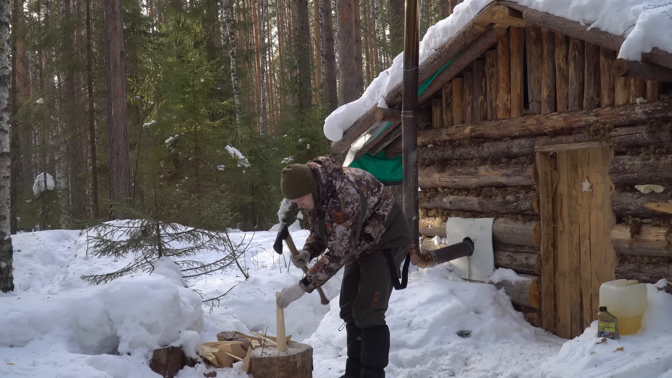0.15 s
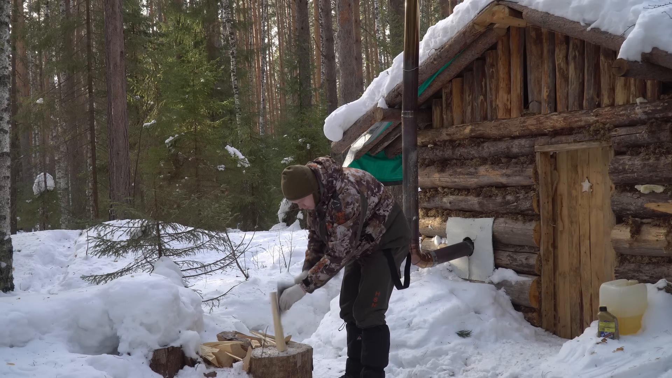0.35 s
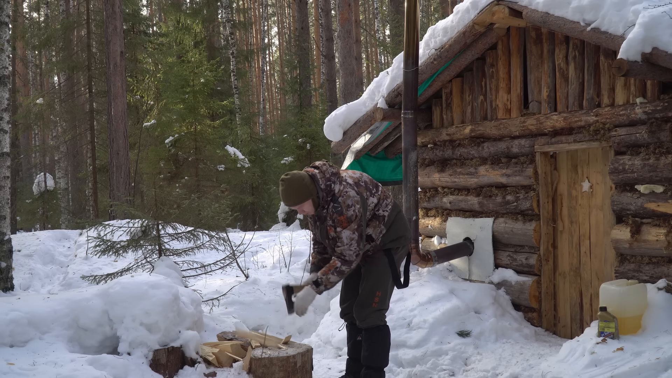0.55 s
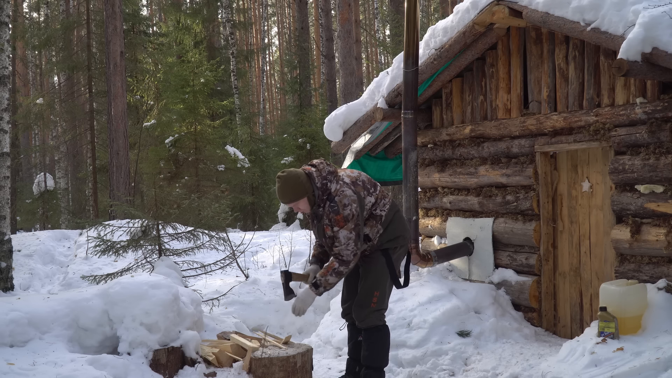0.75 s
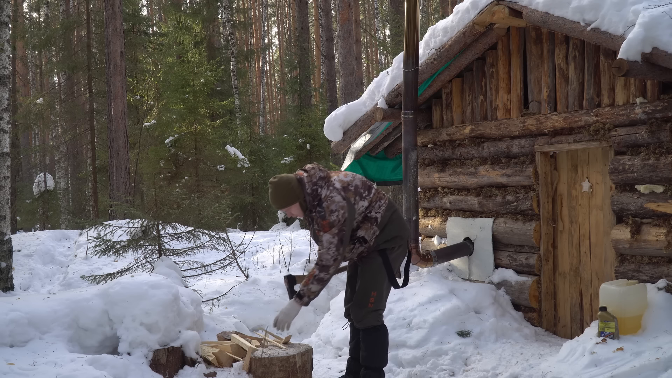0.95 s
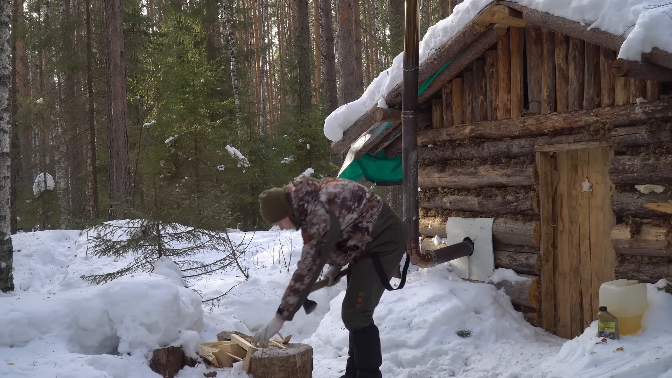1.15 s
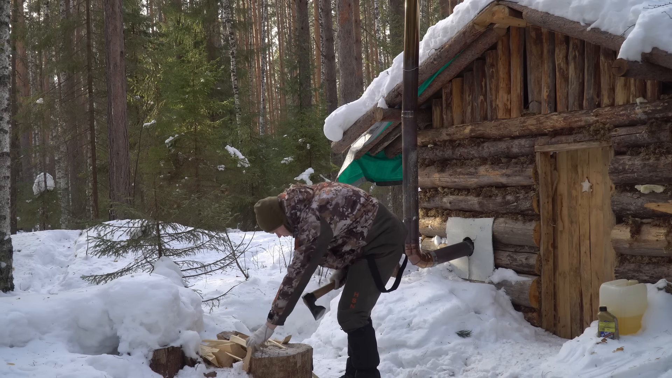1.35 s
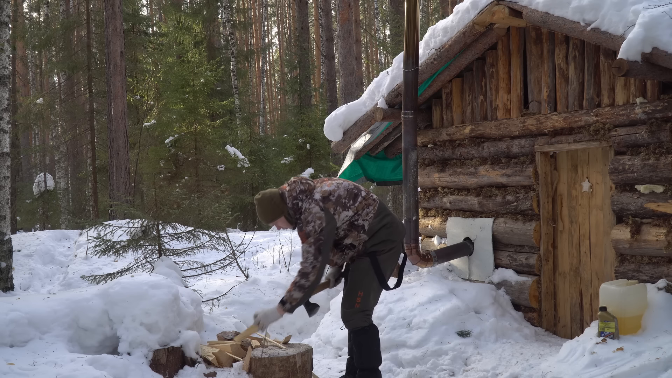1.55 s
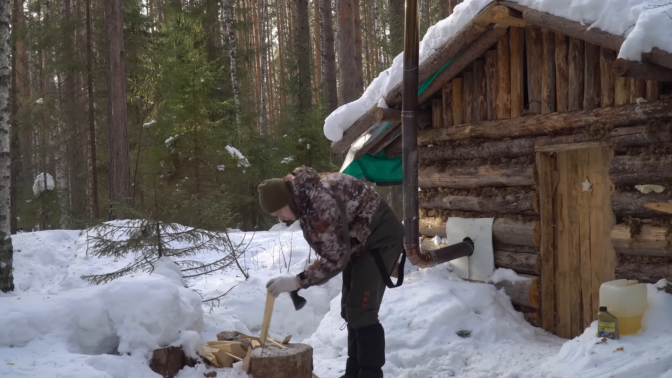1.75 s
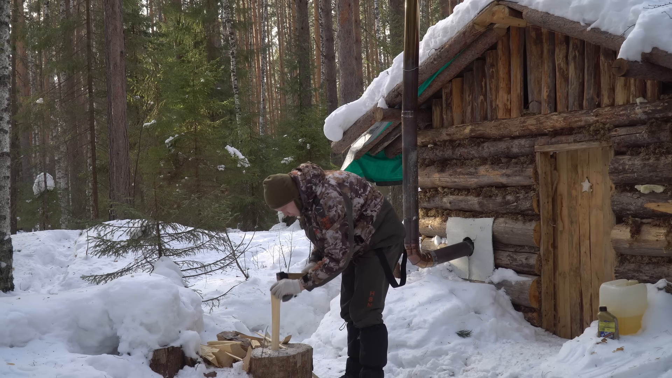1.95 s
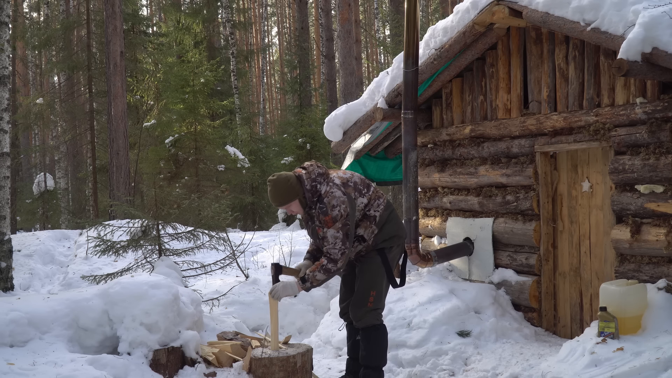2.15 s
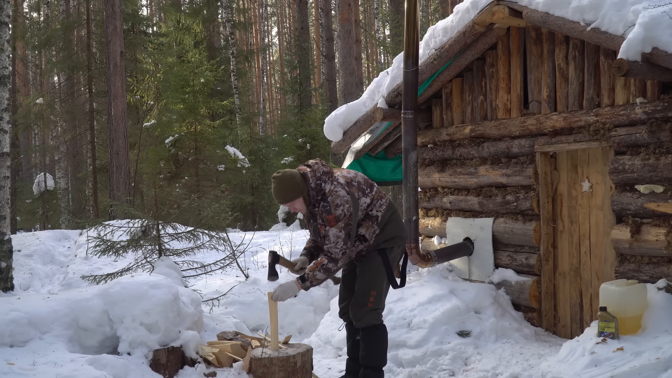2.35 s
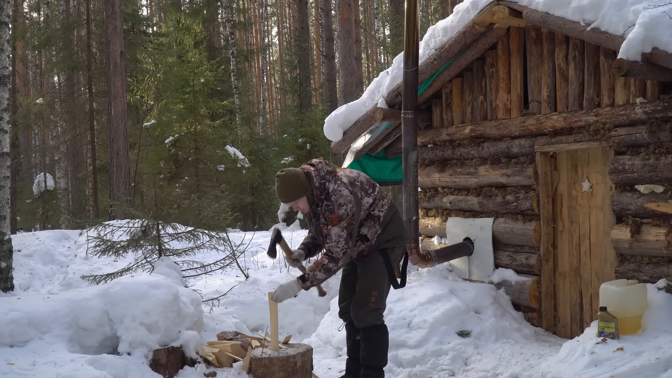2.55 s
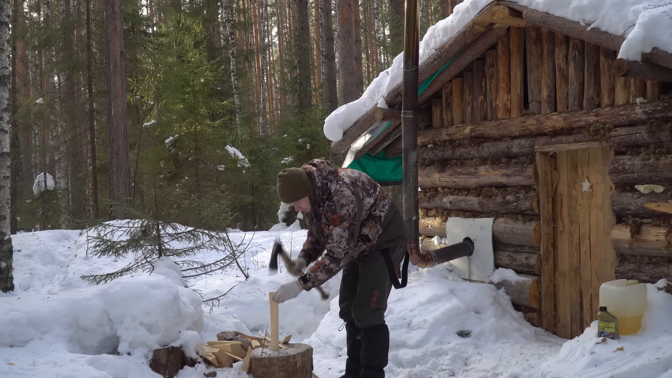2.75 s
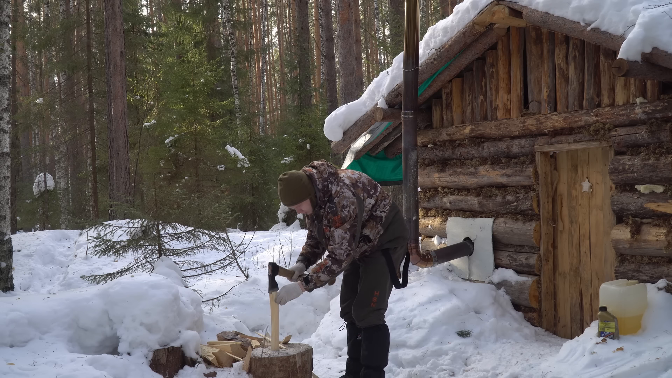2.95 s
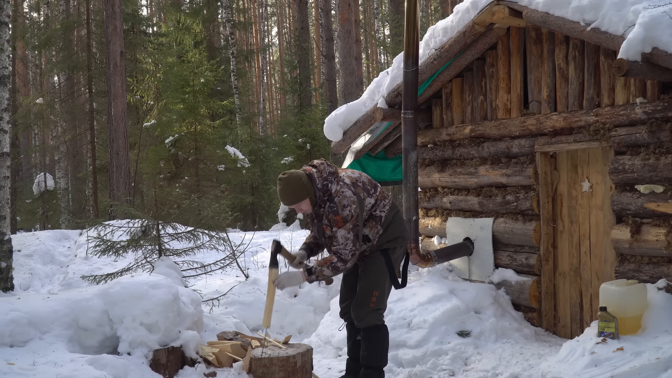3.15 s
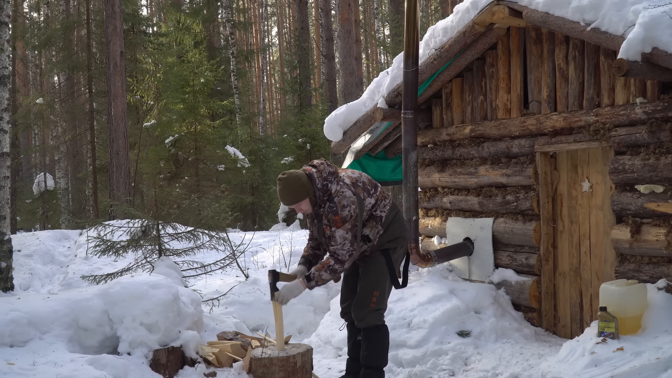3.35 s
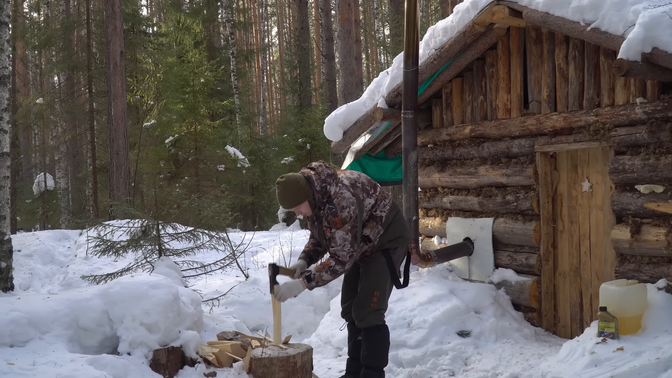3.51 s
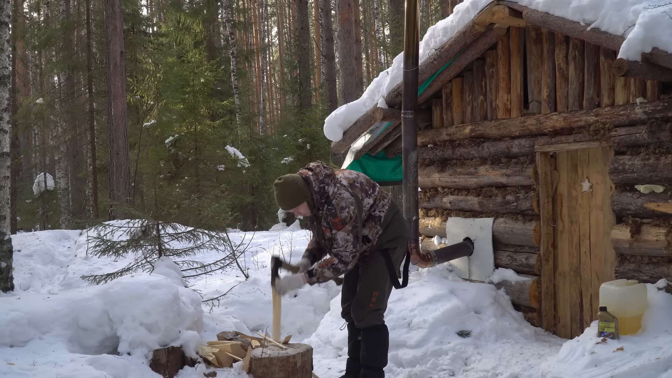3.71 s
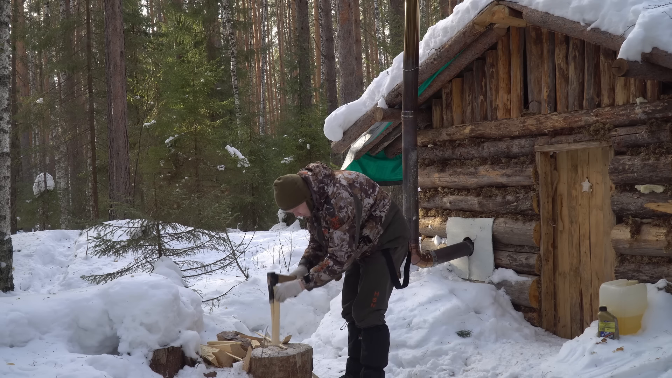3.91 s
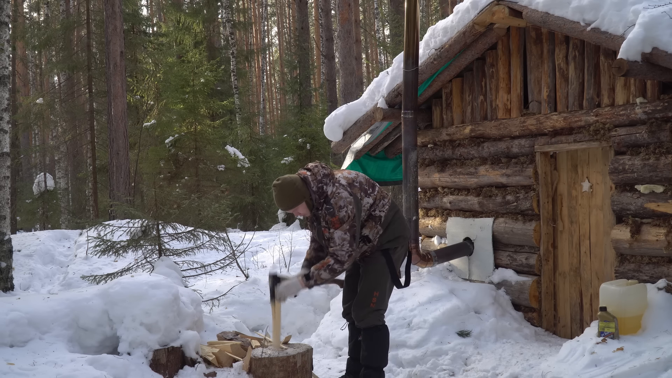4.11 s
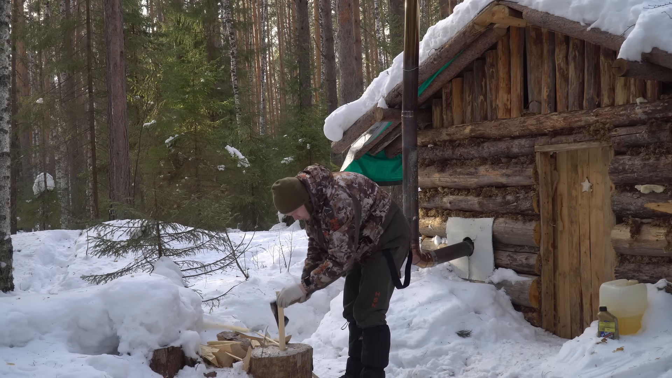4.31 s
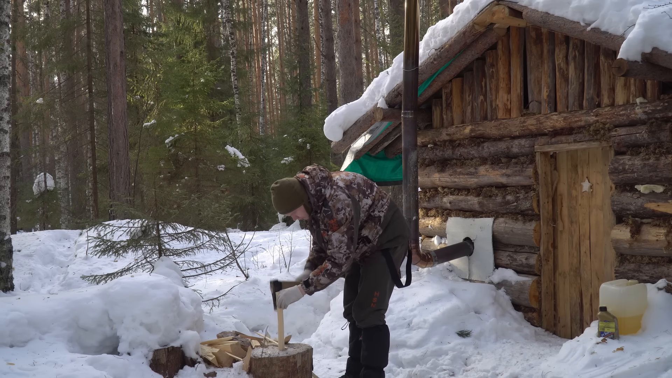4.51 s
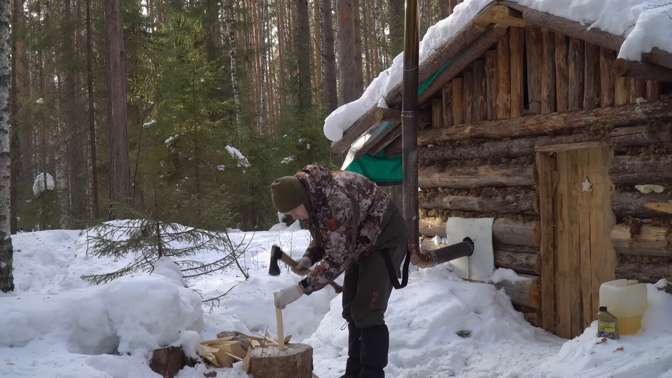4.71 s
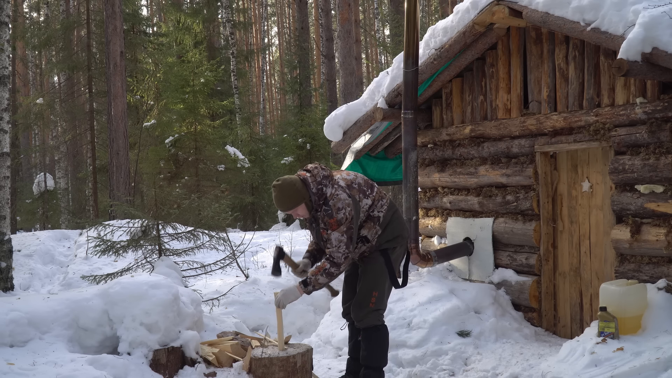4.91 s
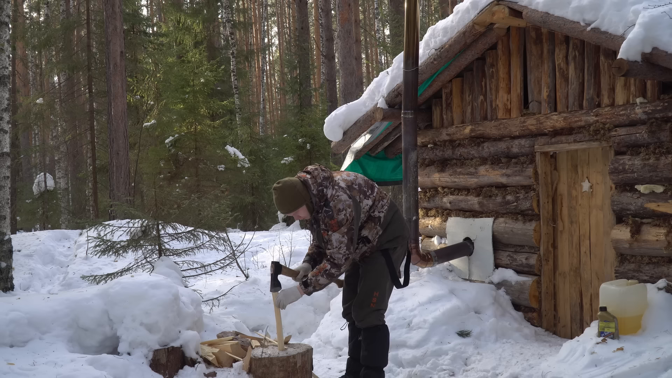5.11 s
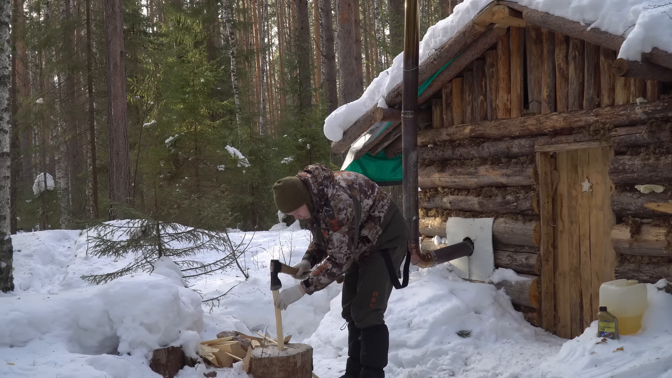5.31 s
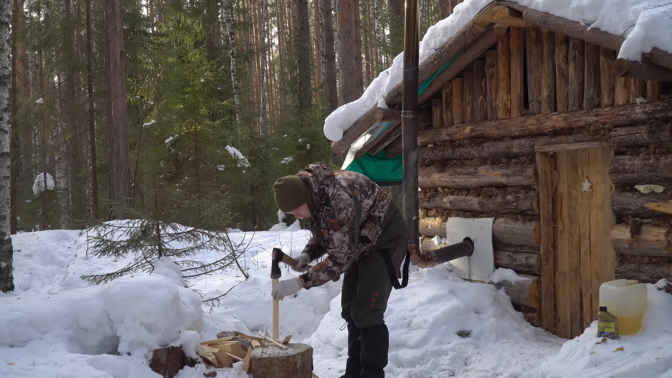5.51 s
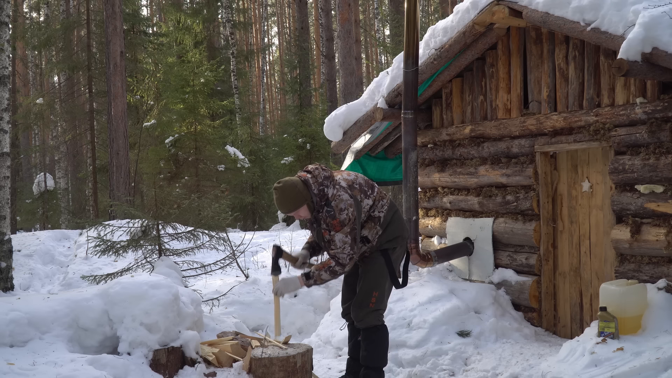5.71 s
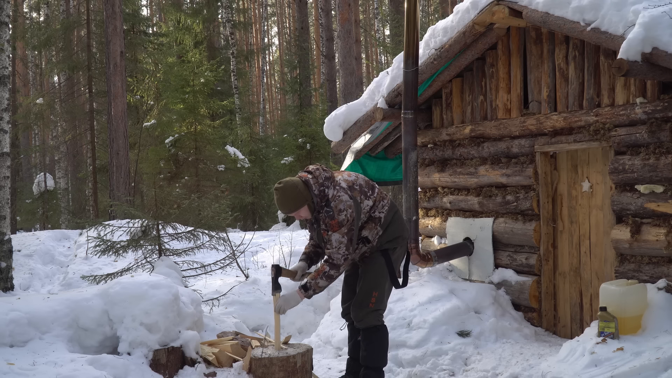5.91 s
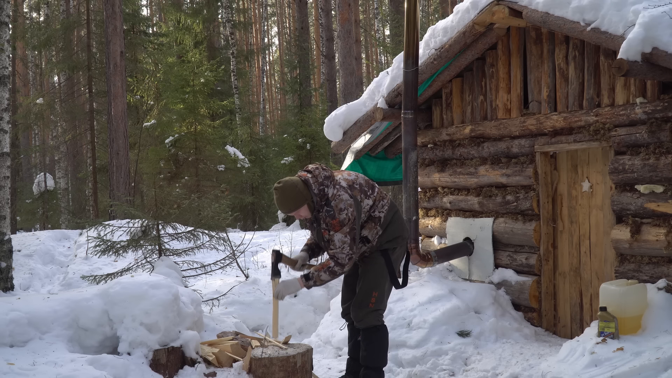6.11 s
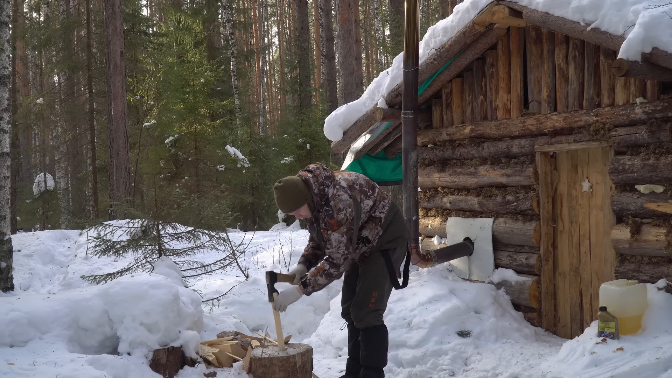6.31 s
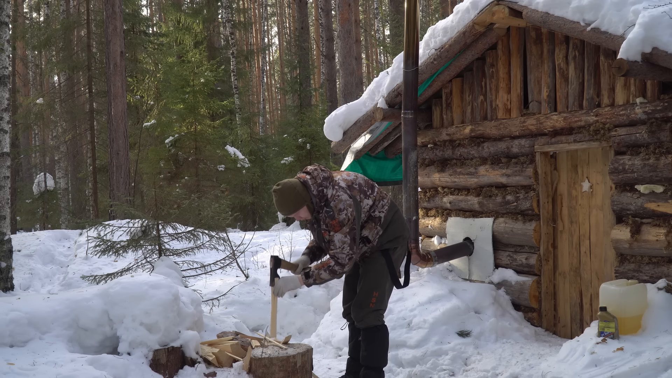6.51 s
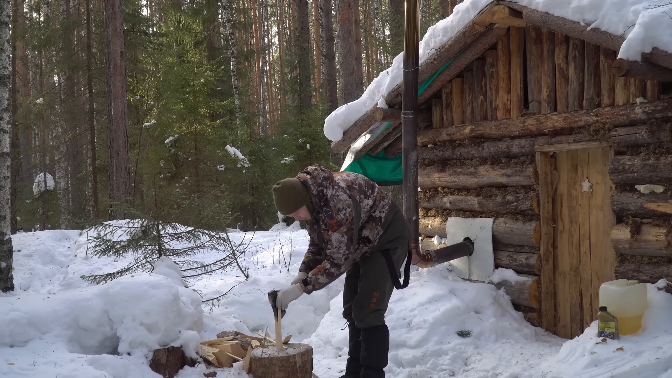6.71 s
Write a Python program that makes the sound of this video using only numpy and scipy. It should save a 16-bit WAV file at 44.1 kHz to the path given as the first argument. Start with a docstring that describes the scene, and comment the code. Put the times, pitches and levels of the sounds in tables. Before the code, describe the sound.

An axe splits dry kindling on a wooden block in a quiet snowy forest, sharp cracks and hollow knocks with split sticks clattering down.

```python
"""In a snowy forest, an axe splits dry kindling on a chopping block a few metres from the microphone.
Each blow is a soft push that sets block, ground and billet ringing; tearing fibres are runs of noisy cracks.
Split sticks knock on the pile and ring in their bending modes; chips tick as short puffs of grains.
Trunks scatter back a tail of fading noise. Below lie a steady forest hush and a rustle of noise and crackles:
first the dying tail of an earlier chop, then the handling of sleeves and wood."""
import sys
import numpy as np
from scipy import signal
from scipy.io import wavfile

SR = 44100
rng = np.random.default_rng(int(sys.argv[2]) if len(sys.argv) > 2 else 0)


def wav_record(signal):
    """Record a signal, one row per channel, as 16-bit PCM in the file named by sys.argv[1]."""
    frames = np.transpose(np.atleast_2d(signal))
    bounded = np.clip(frames, -1, 1)
    # unit amplitude maps onto the largest positive 16-bit level
    quanta = np.round(bounded * 32767).astype(np.int16)
    wavfile.write(sys.argv[1], SR, quanta)


def volts_from_decibels(level):
    """Turn decibel levels (scalar or array-like) into linear amplitude factors."""
    exponent = np.asarray(level, float) / 20
    return 10 ** exponent


N = 302526   # length of the scene in samples

# colour of the forest hush: pitch_hz, level_db (per Hz)
HUSH_COLOUR = [(15, -30), (25, 0), (97, -10), (166, -8.5), (212, -8), (384, -6), (734, -4), (796, -5.5),
               (1940, -17), (2480, -24), (5000, -35), (7310, -69.5), (14800, -43), (16000, -46)]
# colour of the rustle: pitch_hz, level_db (per Hz)
RUSTLE_COLOUR = [(1500, -11.5), (3500, 17.5), (8000, 3.5), (16000, -0.5)]
# level of the rustle, first the dying tail of an earlier chop, then handling of sleeves and wood:
# time_s, level_db
RUSTLE_LEVEL = [(0, -63.5), (0.16, -72.5), (0.5, -73), (1.2, -66), (1.7, -68), (2.4, -71.5), (3.5, -68.5),
                (4.601, -70), (5.599, -73.5), (6.86, -69.5)]
# split sticks by name, each a list of bending modes: pitch_hz, level_db, t60_s (time to fall by 60 dB)
STICK_MODES = { "short": [(685, -15, 0.18), (1200, -5.5, 0.055), (1534, 2.5, 0.08), (3068, -9, 0.07),
               (4570, -9.5, 0.04)], "struck": [(1443, -1.5, 0.083), (1480, -16, 0.032), (2350, -27, 0.028),
               (2596, -1, 0.041), (3010, 2, 0.017), (4960, -13, 0.11)], "thick": [(1060, -2.5, 0.19),
               (1349, 1.5, 0.087), (2170, -2.5, 0.039), (2616, -4.5, 0.038), (3130, -10.5, 0.068)],
               "thin": [(1623, -17.5, 0.09), (1910, -2.5, 0.069), (2954, -18, 0.083), (3390, -10.5, 0.059),
               (4540, -11, 0.035), (6100, -19, 0.012), (8100, -10, 0.0099)], "long": [(489, -19.5, 0.18),
               (1030, -10.5, 0.1), (1311, 2.5, 0.13), (2460, -7, 0.097), (4030, -14.5, 0.17)], }
# sticks being knocked: start_s, level_db, spot along the stick (0 end, 0.5 middle),
# share of its free ring time, stick name
STICK_KNOCKS = [(0.001, -42, 0.17, 0.96, "long"), (0.0836, -27, 0.024, 0.36, "short"),
                (0.094, -38, 0.049, 1, "short"), (0.201, -43.5, 0.18, 0.3, "long"),
                (0.261, -40.5, 0.19, 0.21, "long"), (0.228, -45, .17, .3, "long"),
                (0.283, -46, 0.18, 0.25, "long"), (0.332, -47, 0.15, .3, "long"),
                (0.411, -12.5, 0.036, 0.52, "struck"), (0.6827, -13.5, 0.021, 0.89, "thick"),
                (0.803, -43, 0.024, 1, "thick"), (0.828, -31, 0.13, 0.21, "thick"),
                (0.836, -24.5, 0.18, 0.55, "thick"), (0.835, -16.5, 0.073, 0.91, "thin"),
                (0.891, -38, 0.25, 0.63, "thin"), (0.978, -23, 0.019, 1, "thin"),
                (1.083, -33, 0.021, 1, "thin"), (1.588, -39, 0.29, 0.75, "thin"),
                (1.650, -46, 0.22, 0.83, "thin"), (1.608, -39, 0.029, 0.77, "thin"),
                (4.238, -21, 0.025, 1, "long"), (4.311, -30.5, 0.14, 0.92, "long"),
                (4.462, -27, 0.17, 0.51, "long"), (4.505, -32.5, 0.14, 0.3, "thick"),
                (4.511, -36, 0.039, 0.82, "thin"), (4.549, -28.5, 0.042, 0.47, "long"),
                (4.561, -20.5, 0.091, 0.71, "thin")]
# tail scattered by the forest: pitch_hz, near_db, near_t60_s, far_db, far_t60_s
FOREST_TAIL = [(300, -7.5, 0.16, -45, .5), (1000, -28, .12, -27, 0.49), (2480, -28, 0.29, -33, 0.39),
               (4500, -18, 0.11, -33, 0.97), (8000, -14.5, 0.16, -33.5, 0.39),
               (14100, -22.5, 0.16, -52, 0.12)]
# ticks and rustles of chips, bark and snow: start_s, level_db, centre_hz
CHIP_TICKS = [(0.081, -53, 4560), (0.2004, -55, 6970), (0.2598, -61, 4510), (0.3306, -61, 5470),
              (0.355, -58.5, 5530), (0.43, -41, 5000), (0.7647, -51, 4860), (0.8, -45, 4370),
              (1.1124, -59, 7940), (1.1255, -59, 10200), (1.1735, -50, 5200), (1.312, -53.5, 7750),
              (1.354, -46.5, 5165), (1.4346, -51, 8690), (1.4554, -52.5, 8020), (1.5713, -59, 6200),
              (1.633, -55, 5040), (2.0687, -59, 4970), (2.2877, -56.5, 4950), (3.7974, -56, 4620),
              (3.825, -53, 4630), (4.4395, -48, 5470), (4.505, -51, 4960), (4.5954, -57.5, 7000),
              (4.6084, -57, 5650), (4.716, -56, 4400), (5.0845, -52, 9250), (5.1503, -59, 4780),
              (5.5196, -62, 4600), (6.1226, -64, 4700)]
# fibres tearing in runs of breaks: main_break_s, splinter_db, crunch_db, snap_db, length_s
FIBRE_TEARS = [(0.4105, -34, -21.5, -24, .006), (0.453, -43, -44, -38, .01),
               (0.649, -42.5, -40.5, -44, .02), (0.682, -41, -37, -67, .008), (2.894, -23, -15.5, -14, .01),
               (3.4161, -12, -19, -25, .012), (3.426, -25.5, -40, -21, .012), (3.855, -18, -21, -14, .012),
               (3.8705, -27.5, -43.5, -27, .006), (4.2264, -39, -36, -44.5, .006),
               (4.2365, -11.5, -16, -15, .008), (4.463, -33, -46, -37, .015),
               (5.0739, -51, -30.5, -40, .006), (5.8804, -17, -33.5, -19.5, .008),
               (5.8837, -26, -36, -26, .014), (6.3405, -22, -25.5, -29, .008),
               (6.347, -20.5, -32, -24.5, .006), (6.3523, -21.5, -33, -21, .016),
               (6.362, -32, -45, -23.5, .012), (6.3727, -30.5, -33.5, -20, .006),
               (6.7129, -16.5, -22.5, -18, .014), (6.736, -26.5, -49, -12.5, .006),
               (6.7523, -13.5, -36, -16.5, .012)]
# the breaks of every run, a lead-in, the main break, then ever weaker ones, the last two longer:
# place along the run (0-1), level_db, t60_s
RUN_BREAKS = [(0, -18, .03), (0, 2, .016), (0.298, -6, 0.012), (.62, -12, .025), (1.0, -17.5, 0.044)]
# resonances of the split faces: pitch_hz, width_hz, level_db
FACE_PEAKS = [(3109, 1130, -1), (4354, 886, 12.5), (5330, 2700, -6.5)]
# low crunch of the billet as it tears: pitch_hz, width_hz, level_db
CRUNCH_PEAKS = [(1220, 660, 8), (1710, 310, 14), (2133, 1200, 3)]
# blows into the block: start_s, thud_db, knock_db, boom_db (of the ground), billet_hz
AXE_BLOWS = [(0.4105, -44, -35.5, -49, 680), (0.649, -60, -49, -38, 590), (0.6815, -67, -61, -38, 750),
             (0.828, -47, -35.5, -36, 744), (2.8915, -24, -15.5, -49.5, 632), (3.415, -25.5, -25, -29, 454),
             (3.852, -25.5, -20, -43, 687), (4.229, -28, -35.5, -55, 476), (4.238, -46.5, -27.5, -42, 680),
             (5.073, -29, -28.5, -26, 620), (5.876, -28, -34, -52, 507), (6.338, -28.5, -26.5, -51, 792),
             (6.7115, -37, -30.5, -40.5, 474)]
# modes of the chopping block: pitch_hz, level_db, t60_s
BLOCK_MODES = [(236, -1.5, 0.048), (327.4, -3.5, 0.036)]
# modes of the frozen ground: pitch_hz, level_db, t60_s
GROUND_MODES = [(68.5, -3.5, 0.17), (119.4, -1.5, 0.074)]
# modes of the struck billet: multiple of the billet pitch, level_db, t60_s
BILLET_MODES = [(.62, -14.5, 0.031), (1.001, 3.5, 0.027), (1.5, -16.5, .02)]

HUSH_DB = -54
# crackle rate at a given rustle level; dB of rate per dB of rustle
CRACKLES_PER_S, CRACKLE_AT_DB, CRACKLE_FOLLOWS = 93, -70.5, 1.5
# the end of a stick lands with its whole weight, a soft contact;
# knocks toward the middle glance off, briefer and brighter
CONTACT_HZ, OCTAVES_ALONG = 2940, 9.3   # contact cutoff at the end; octaves it climbs per unit of spot
TICK_T60_S = .035
SPLINTER_HZ, SPLINTER_SPREAD_OCTAVES = 4256, 0.16
BREAK_SPREAD_DB, BREAK_JITTER = 2.0, .08   # chance in level; chance in timing as a share of the place
LEAD_S = .002   # the lead-in comes this long before the main break
BASS_CUT_HZ, MIC_HIGH_HZ = 80, 14510


def rms_one(x):
    """Scale to an average strength (rms) of 1."""
    return x / np.sqrt(np.mean(x ** 2) + 1e-20)


def bands(first_hz=22):
    """Half-octave band-passes as (centre Hz, filter sections)."""
    edges = first_hz * 2 ** np.arange(0, 10, .5)
    return [(np.sqrt(low * high), signal.butter(2, [low, high], "band", fs=SR, output="sos"))
            for low, high in zip(edges, edges[1:])]


def at_hz(points, hz, axis=1):
    """Read a column of a table between its rows, along log frequency."""
    points = np.array(points)
    return np.interp(np.log(hz), np.log(points[:, 0]), points[:, axis])


def drift(rate):
    """Slow random wander: straight lines between knots of rms 1, at most 39 knots a second."""
    knots = rng.standard_normal(int(N / SR * 40) + 2)
    return np.interp(np.arange(N) / SR * min(rate, 39), np.arange(len(knots)), rms_one(knots))


def resonate(x, peaks):
    """Parallel resonances, scaled so that white noise keeps its rms."""
    out, power = 0, 0
    for k, (hz, width, db) in enumerate(peaks):
        r = np.exp(-np.pi * width / SR)
        top = [(1 - r * r) / 2, 0, (r * r - 1) / 2]
        bottom = [1, -2 * r * np.cos(2 * np.pi * hz / SR), r * r]
        # the sign alternates from peak to peak
        out = out + (-1) ** k * volts_from_decibels(db) * signal.lfilter(top, bottom, x)
        power += volts_from_decibels(2 * db) * np.pi * width / SR
    return out / np.sqrt(power)


def burst(t60, rise_s):
    """Envelope with a top of 1: a quick rise, then an exponential fall."""
    t60 = max(t60, .004)
    t = np.arange(int(1.2 * t60 * SR)) / SR
    shape = (1 - np.exp(-t / rise_s)) * volts_from_decibels(-60 * t / t60)
    return shape / shape.max()


def add(out, s, piece):
    """Mix a piece in at time s."""
    at = round(s * SR)
    out[at:at + len(piece)] += piece[:N - at]


def grains(spread_db):
    """Dense breaks of uneven size and random sign; rms 1."""
    size_db = spread_db * np.minimum(rng.exponential(1, N), 5)
    return rms_one(rng.choice([-1, 1], N) * volts_from_decibels(size_db))


def coloured(spectrum, patchy_db, rate):
    """Hush or rustle: noise in bands that each flicker on their own; rms 1."""
    white = rng.standard_normal((2, N))
    out = 0
    for k, (hz, sos) in enumerate(bands()):
        gain = volts_from_decibels(at_hz(spectrum, hz) + patchy_db * drift(rate))
        # neighbouring bands take different noise
        out = out + gain * signal.sosfilt(sos, white[k % 2])
    return rms_one(out)


def crackle(per_s, spread_db=0.0):
    """Tiny chance ticks, each a few ms of hiss in one of several treble bands."""
    size = volts_from_decibels(spread_db * np.minimum(rng.exponential(1, N), 3))
    born = (rng.random(N) < per_s / SR) * size
    envelope = signal.fftconvolve(born, burst(0.011, rise_s=.0005))[:N]
    puffs = envelope * rng.standard_normal(N)
    # each new tick moves the hiss to the next band
    dealt = np.cumsum(born > 0) % 4
    return sum(resonate(puffs * (dealt == k), [(hz, 3000, 0)])
               for k, hz in enumerate((5000, 8400, 11000, 13500)))


def sticks(tumble_db=3.0, scuff_db=-22):
    """A harder contact reaches higher modes, a knock near a node leaves that mode out, the pile damps the ring."""
    out, scuff = np.zeros((2, N))
    t = np.arange(SR // 3) / SR
    # a tumbling stick turns each mode toward the microphone and away
    tumble = volts_from_decibels(tumble_db * drift(39))
    for s, db, spot, free, stick in STICK_KNOCKS:
        cut_hz = CONTACT_HZ * 2 ** (OCTAVES_ALONG * spot)
        onset = 1 - np.exp(-np.pi * cut_hz * t)
        add(scuff, s, volts_from_decibels(db + scuff_db) * burst(0.031, rise_s=0.000297))
        for k, (hz, mode_db, t60) in enumerate(STICK_MODES[stick]):
            reach = np.cos(np.pi * (k + 1) * spot) / (1 + (hz / cut_hz) ** 2)
            # each mode reads the tumbling a second later, so modes turn differently
            turn = np.roll(tumble, -round((s + k) * SR))[:len(t)]
            fall = volts_from_decibels(db + mode_db - 60 * t / (free * t60))
            add(out, s, reach * onset * turn / turn[0] * fall * np.sin(2 * np.pi * hz * t))
    # rough faces scuff as they meet
    scuff_band = signal.butter(2, [900, 5000], "band", fs=SR, output="sos")
    return out + signal.sosfilt(scuff_band, scuff * grains(spread_db=6.0))


def forest(x, gap_s=0.0068):
    """The hut and near trunks scatter back a short tail, the far forest a faint long one."""
    t = np.arange(2 * SR // 3) / SR
    white, tail = rng.standard_normal((2, len(t))), 0
    for k, (hz, sos) in enumerate(bands()):
        near = volts_from_decibels(at_hz(FOREST_TAIL, hz) - 60 * t / at_hz(FOREST_TAIL, hz, axis=2))
        far = volts_from_decibels(at_hz(FOREST_TAIL, hz, axis=3) - 60 * t / at_hz(FOREST_TAIL, hz, axis=4))
        tail = tail + (near + far) * signal.sosfilt(sos, white[k % 2])
    # the tail fades in
    tail = tail * (1 - np.exp(-t / gap_s)) / np.sqrt(SR / 100)
    return signal.fftconvolve(x, tail)[:N]


def ticks():
    """Chips, bark and snow make short broad puffs of grains around a centre pitch."""
    out, grit = np.zeros(N), grains(spread_db=7.0)
    for s, db, hz in CHIP_TICKS:
        shape, at = volts_from_decibels(db) * burst(TICK_T60_S, rise_s=0.00034), round(s * SR)
        puff = shape * grit[at:at + len(shape)]
        add(out, s, resonate(puff, [(hz, 900, 0), (4500, 12000, -7)]))
    return out


def cracks(first_db=16, faces_db=1.5, width_hz=1100, snap_fall=1.75):
    """Each break opens with one strong fibre; it shakes splinter, split faces and billet, and snaps into the air."""
    faces, crunch, snap, splinters = np.zeros((4, N))
    grit = grains(spread_db=0.5)
    chance = rng.standard_normal((len(FIBRE_TEARS), len(RUN_BREAKS), 3))
    for (start, splinter_db, crunch_db, snap_db, length), draws in zip(FIBRE_TEARS, chance):
        for k, ((place, db, t60), (late, loud, pitch)) in enumerate(zip(RUN_BREAKS, draws)):
            s = start + length * place * (1 + BREAK_JITTER * late) - LEAD_S * (k == 0)
            shape, at = burst(t60, rise_s=.0001), round(s * SR)
            tear = shape * grit[at:at + len(shape)]
            tear[3] = volts_from_decibels(first_db)   # the strong fibre
            # every break but the main one varies in level
            tear = tear * volts_from_decibels(db + BREAK_SPREAD_DB * loud * (k != 1))
            hz = SPLINTER_HZ * 2 ** (SPLINTER_SPREAD_OCTAVES * pitch)
            splinter = resonate(np.pad(tear, (0, 600)), [(hz, width_hz, 0)])
            add(splinters, s, volts_from_decibels(splinter_db) * splinter)
            add(faces, s, volts_from_decibels(splinter_db + faces_db) * tear)
            add(crunch, s, volts_from_decibels(crunch_db) * tear)
            # the airborne snap dies sooner than the wood
            add(snap, s, volts_from_decibels(snap_db) * tear * shape ** snap_fall)
    # the tiny offset keeps the filters from slowing down in silence
    faces = resonate(faces + 1e-18, FACE_PEAKS)
    crunch = resonate(crunch + 1e-18, CRUNCH_PEAKS)
    snap = signal.sosfilt(signal.butter(2, 6000, "high", fs=SR, output="sos"), snap + 1e-18)
    return splinters + faces + crunch + snap


def ring(push, modes):
    """A unit click sets every mode ringing at its height; no mode rings longer than 0.5 s."""
    out = 0
    for hz, db, t60 in modes:
        r, w = volts_from_decibels(-60 / (min(t60, .5) * SR)), 2 * np.pi * hz / SR
        top, bottom = [0, volts_from_decibels(db) * np.sin(w)], [1, -2 * r * np.cos(w), r * r]
        out = out + signal.lfilter(top, bottom, push + 1e-18)
    return out


def blows():
    """Block and frozen ground get a soft push, the billet a shorter one."""
    thud, boom, knocks = np.zeros((3, N))
    for s, thud_db, knock_db, boom_db, billet_hz in AXE_BLOWS:
        # push lengths are in samples
        add(thud, s, volts_from_decibels(thud_db) * np.hanning(40) / 20)
        add(boom, s, volts_from_decibels(boom_db) * np.hanning(120) / 60)
        push = np.pad(volts_from_decibels(knock_db) * np.hanning(14) / 7, (0, 3000))
        add(knocks, s, ring(push, [(ratio * billet_hz, db, t60) for ratio, db, t60 in BILLET_MODES]))
    return ring(thud, BLOCK_MODES) + ring(boom, GROUND_MODES) + knocks


def scene():
    """Wood sounds with their scattered tail over hush and rustle."""
    hush = volts_from_decibels(HUSH_DB) * coloured(HUSH_COLOUR, patchy_db=0.3, rate=5.4)
    rustle_db = np.interp(np.arange(N) / SR, *np.transpose(RUSTLE_LEVEL))
    # a louder rustle also crackles more often
    per_s = CRACKLES_PER_S * volts_from_decibels(CRACKLE_FOLLOWS * (rustle_db - CRACKLE_AT_DB))
    texture = coloured(RUSTLE_COLOUR, patchy_db=0.75, rate=14) + volts_from_decibels(-7.0) * crackle(per_s)
    rustle = volts_from_decibels(rustle_db) * texture
    wood = sticks() + ticks() + cracks() + blows()
    # small bodies radiate no deep bass
    wood = signal.sosfilt(signal.butter(4, BASS_CUT_HZ, "high", fs=SR, output="sos"), wood)
    return (wood + forest(wood) + hush + rustle)[None]


def roll_off(x):
    """The treble ends steeply here."""
    return signal.sosfilt(signal.butter(12, 16990, fs=SR, output="sos"), x)


def record(dry):
    """The microphone rolls off at the top."""
    heard = signal.sosfilt(signal.butter(8, MIC_HIGH_HZ, fs=SR, output="sos"), dry)
    return roll_off(heard)


dry = scene()
out = record(dry)
wav_record(out)
```